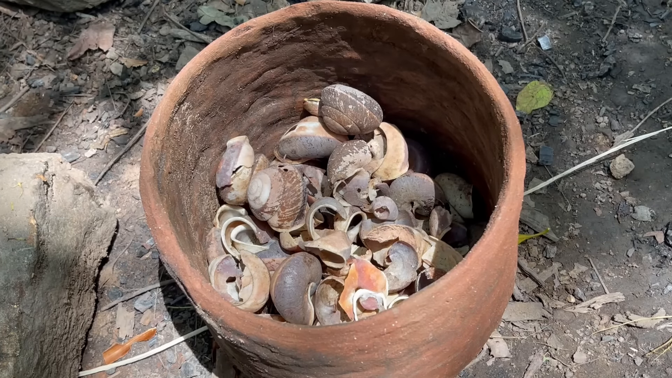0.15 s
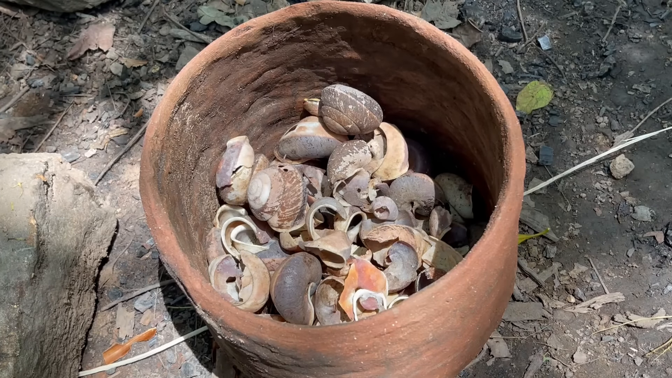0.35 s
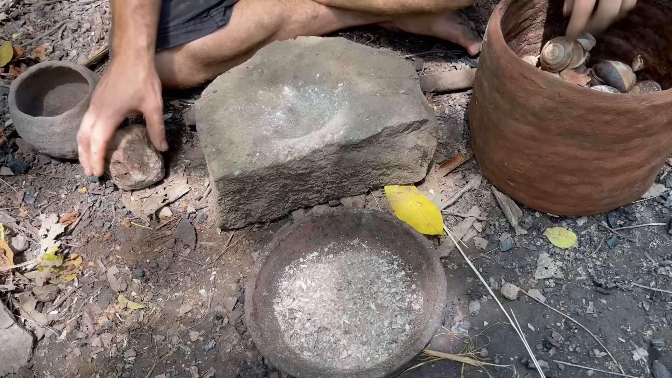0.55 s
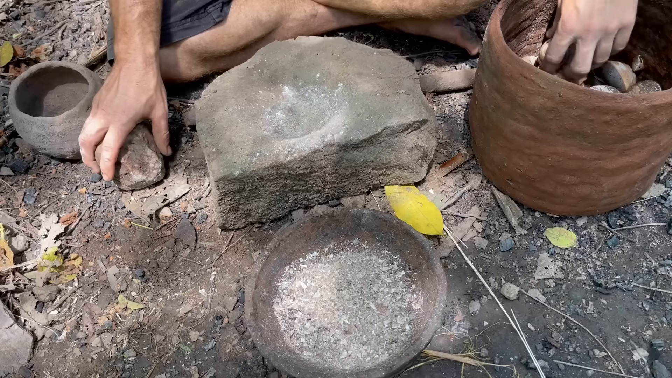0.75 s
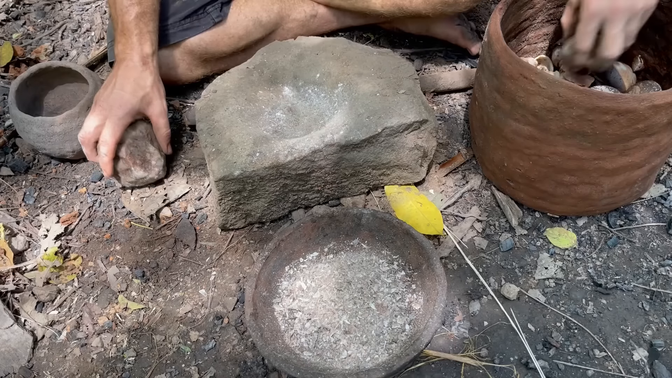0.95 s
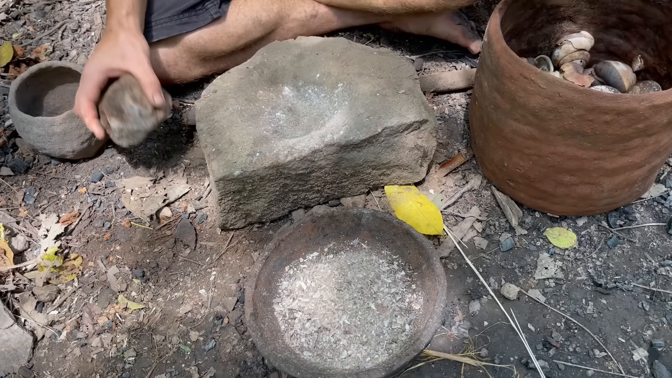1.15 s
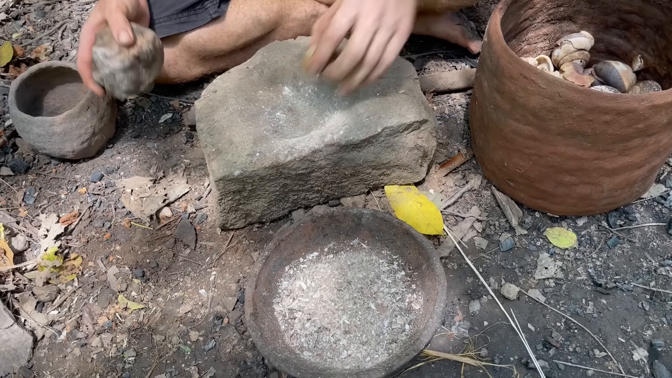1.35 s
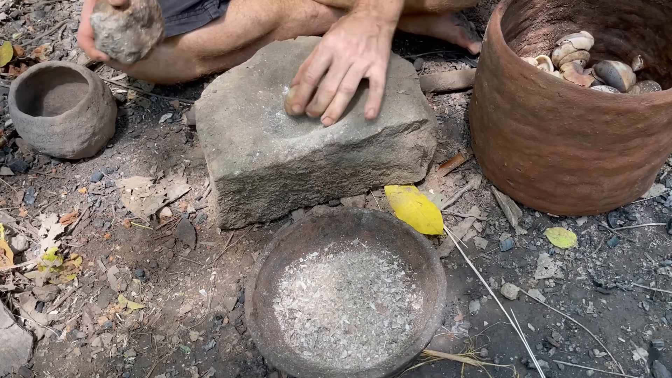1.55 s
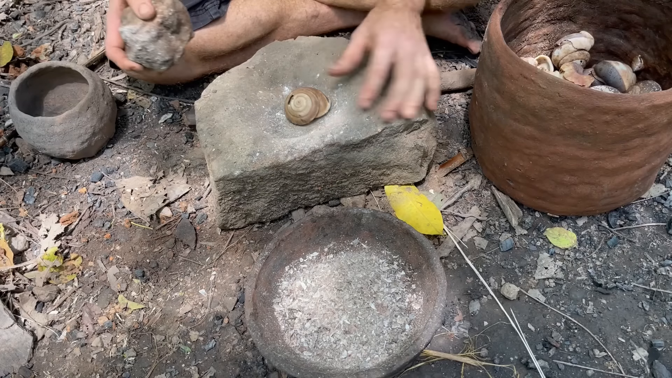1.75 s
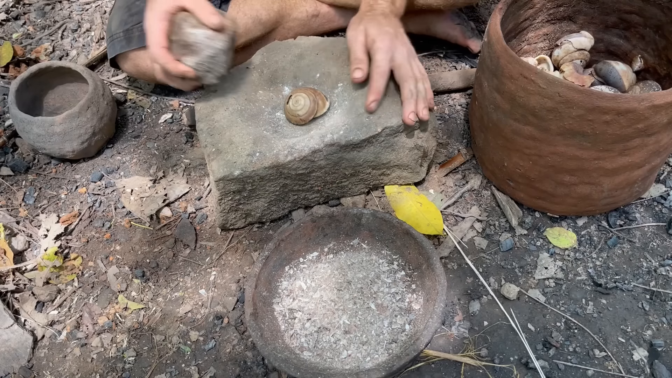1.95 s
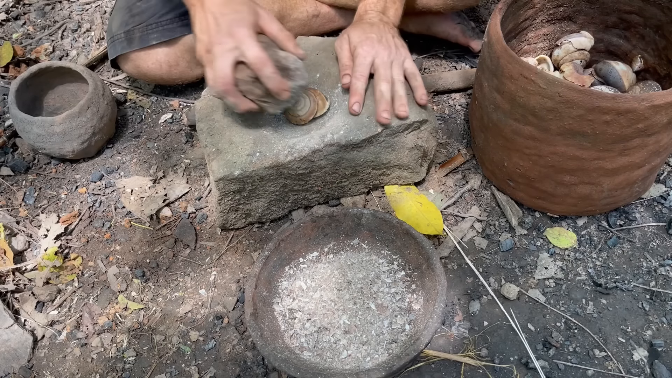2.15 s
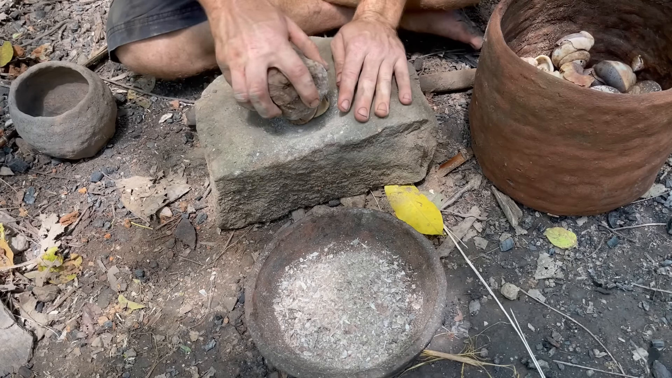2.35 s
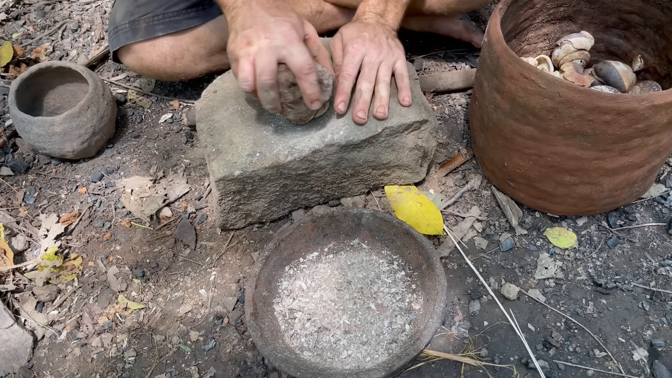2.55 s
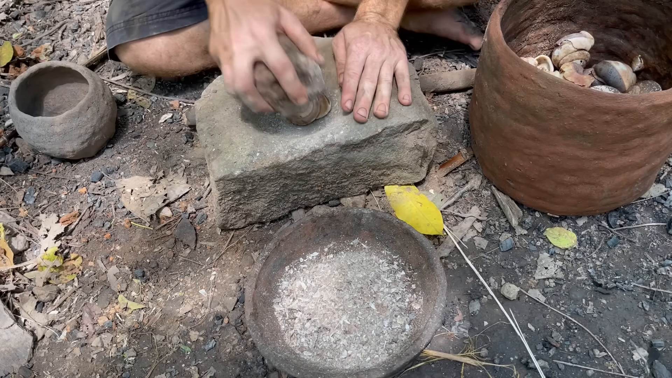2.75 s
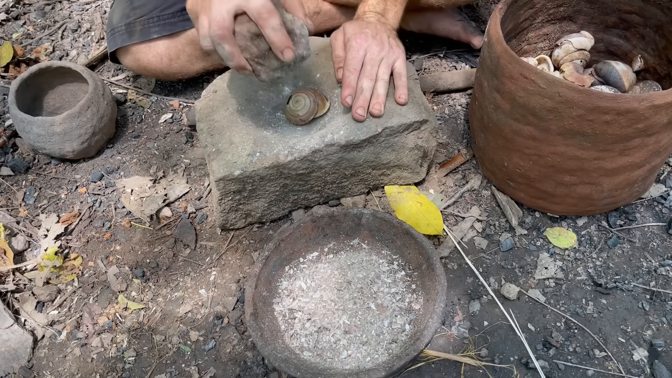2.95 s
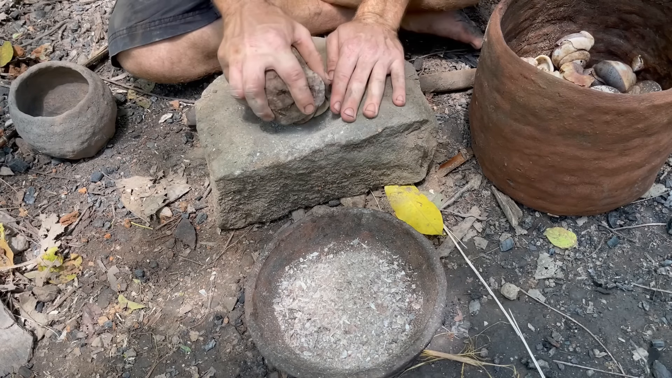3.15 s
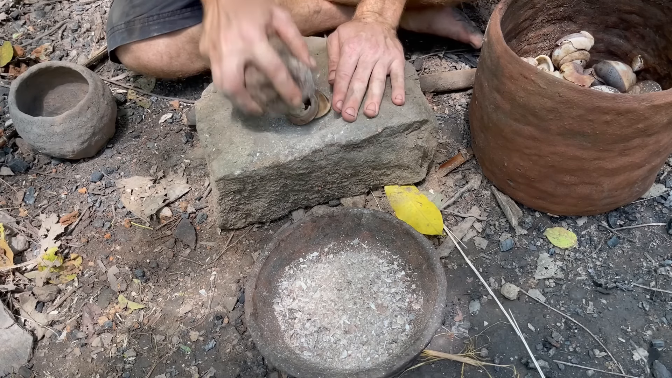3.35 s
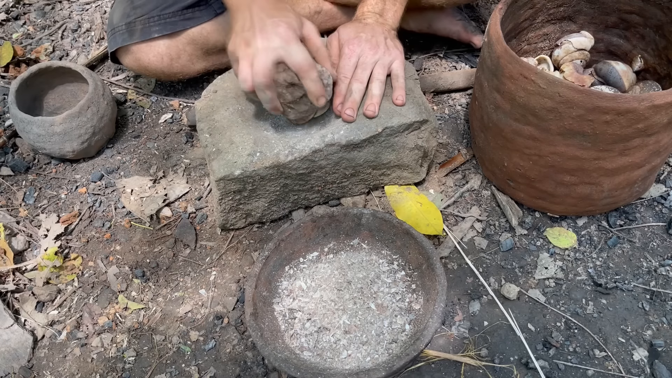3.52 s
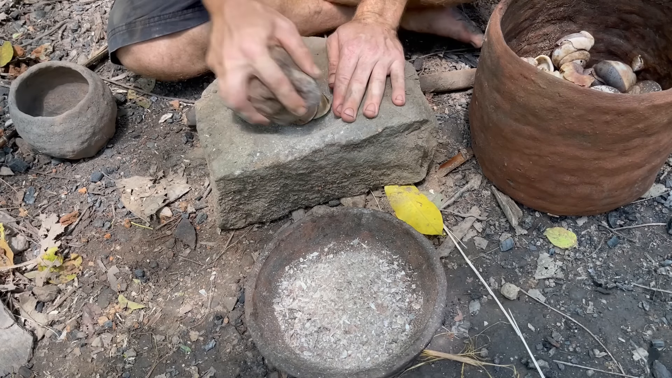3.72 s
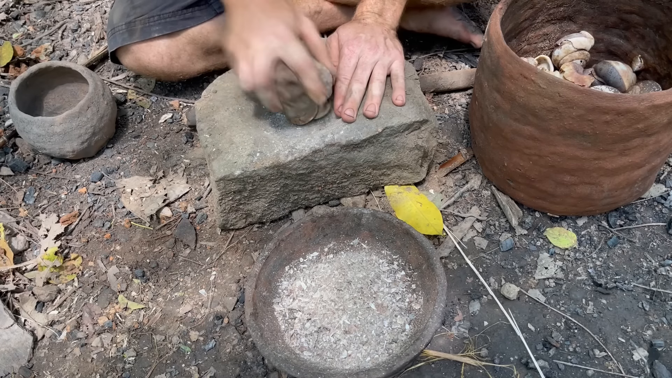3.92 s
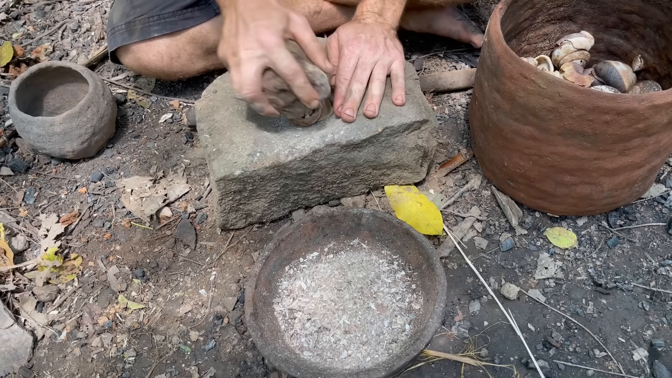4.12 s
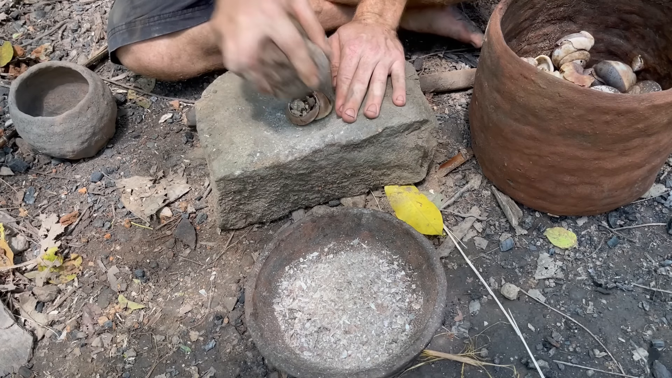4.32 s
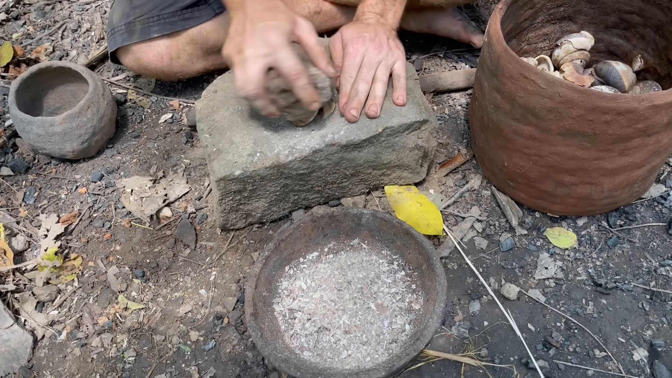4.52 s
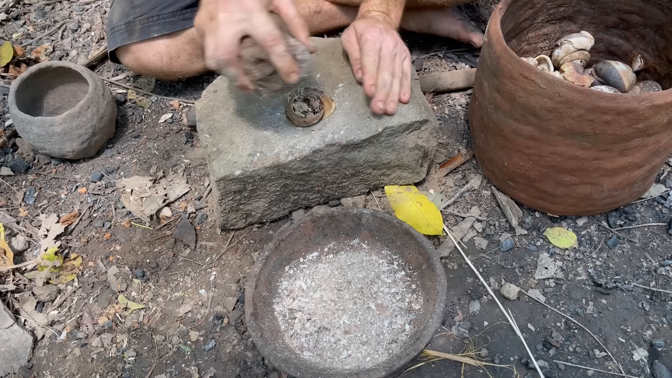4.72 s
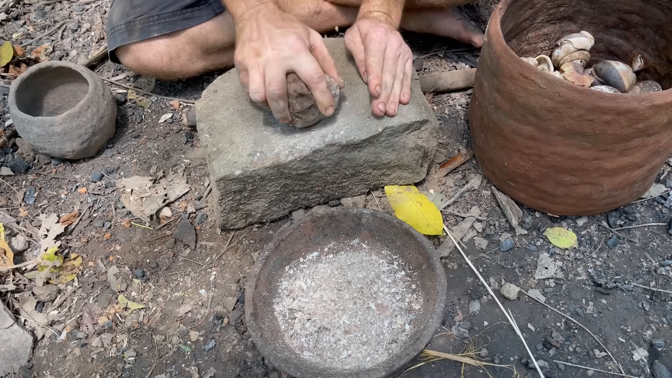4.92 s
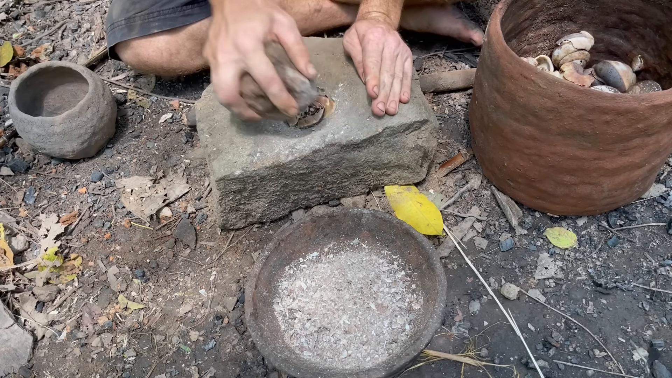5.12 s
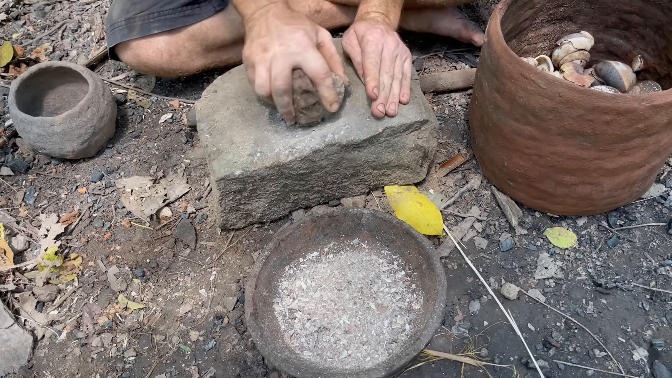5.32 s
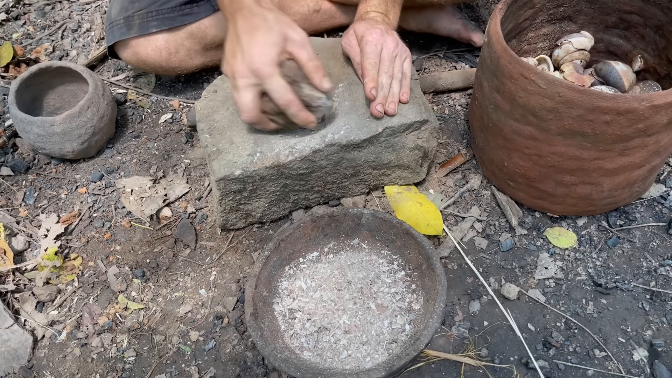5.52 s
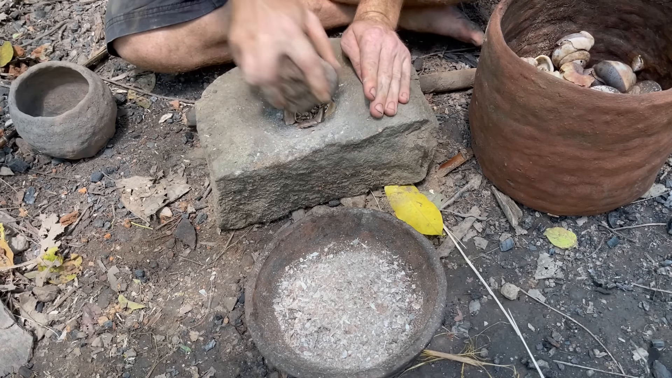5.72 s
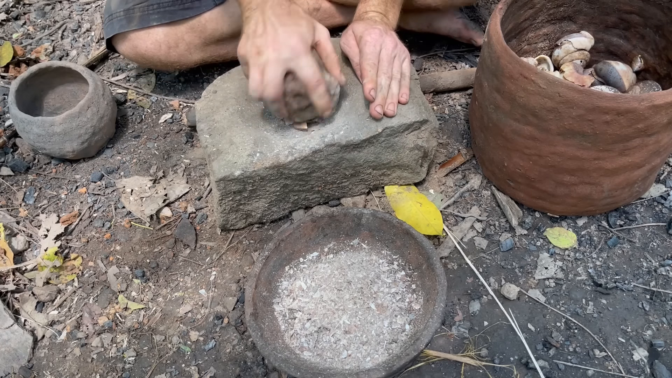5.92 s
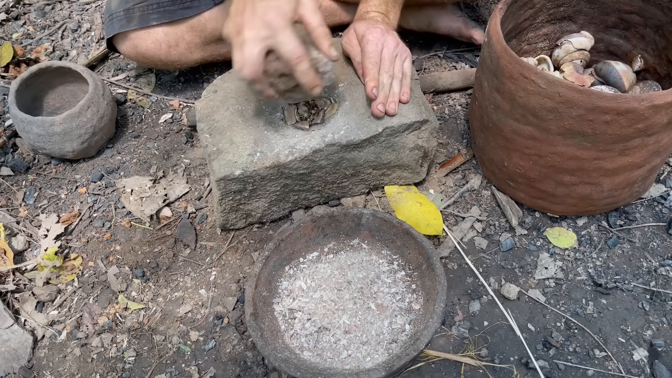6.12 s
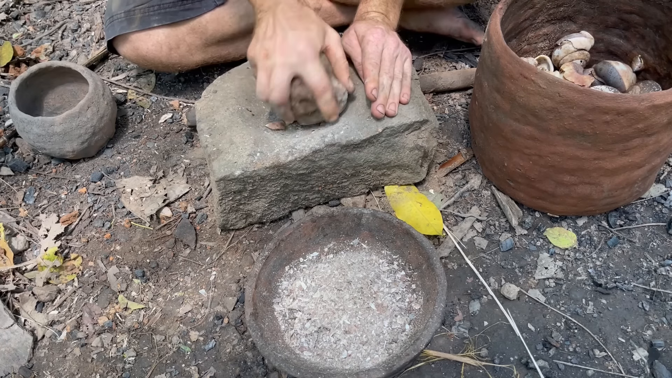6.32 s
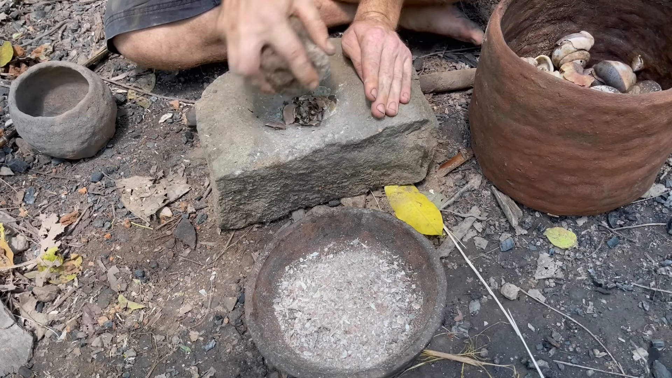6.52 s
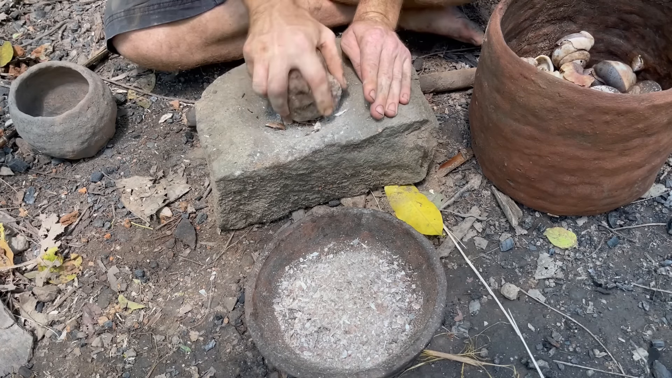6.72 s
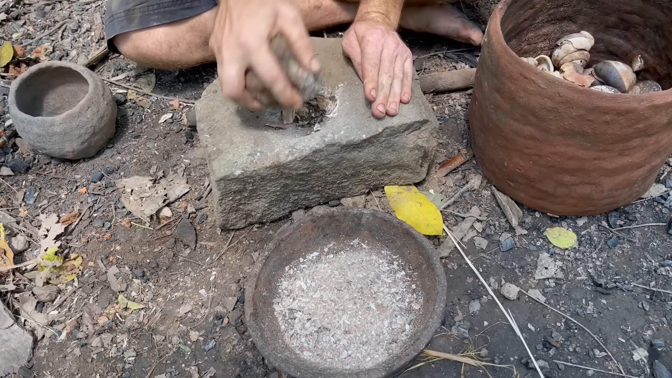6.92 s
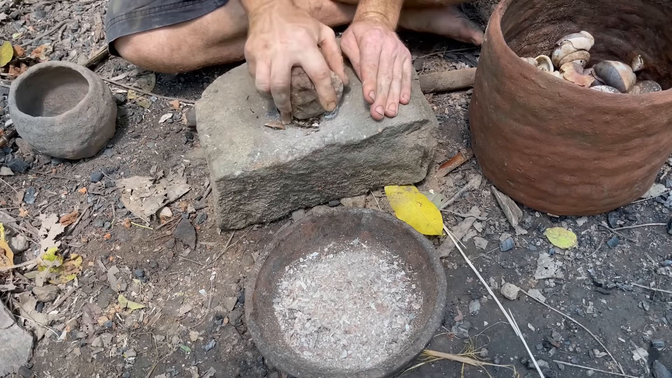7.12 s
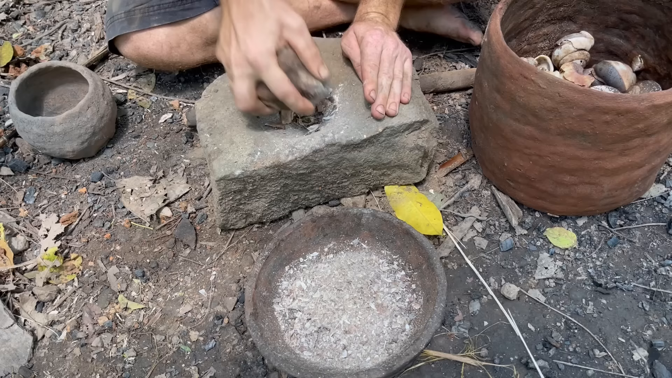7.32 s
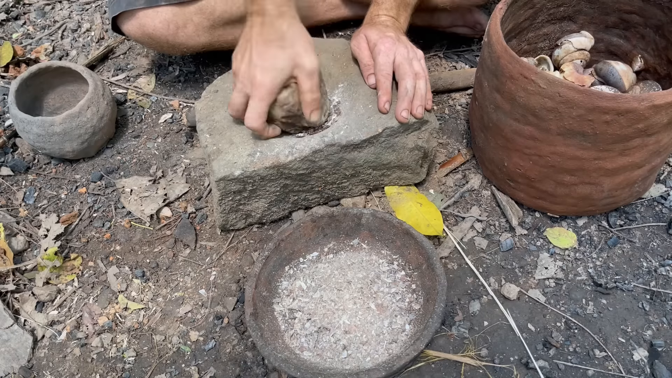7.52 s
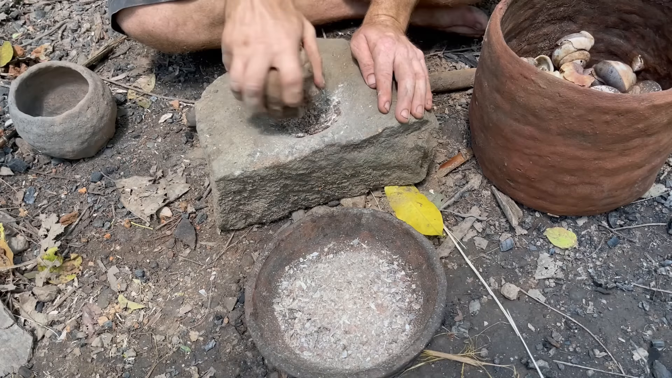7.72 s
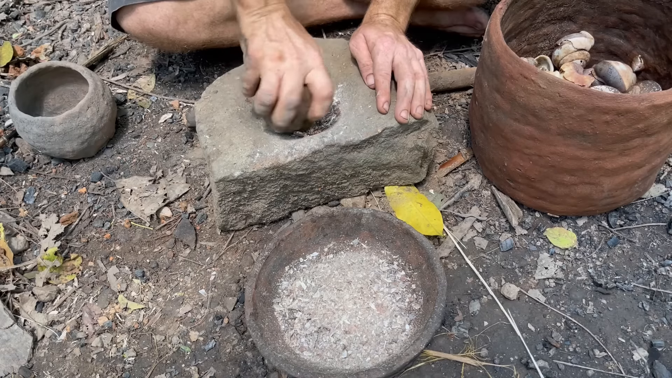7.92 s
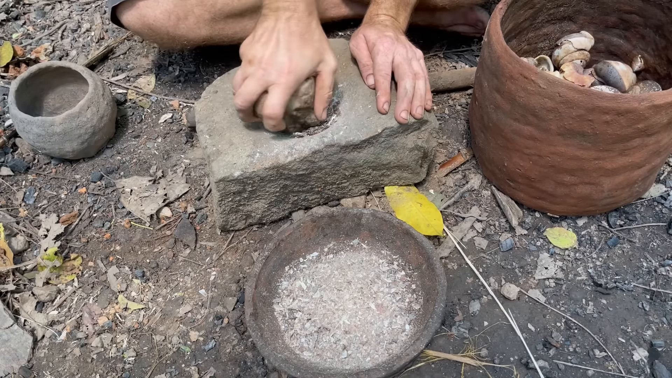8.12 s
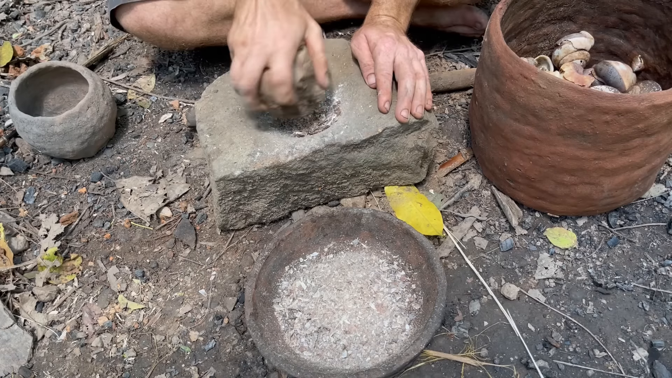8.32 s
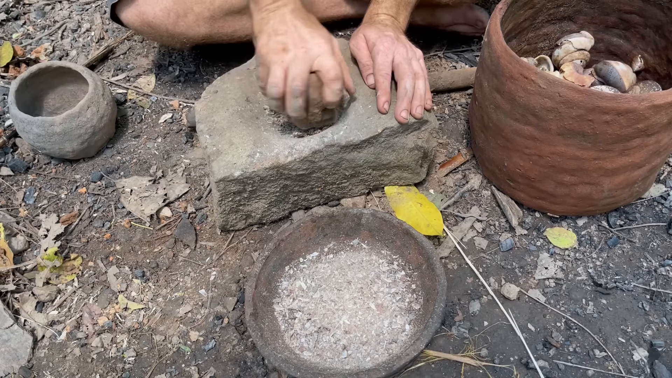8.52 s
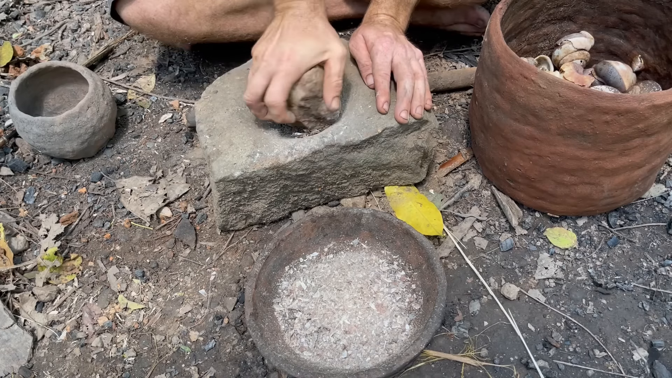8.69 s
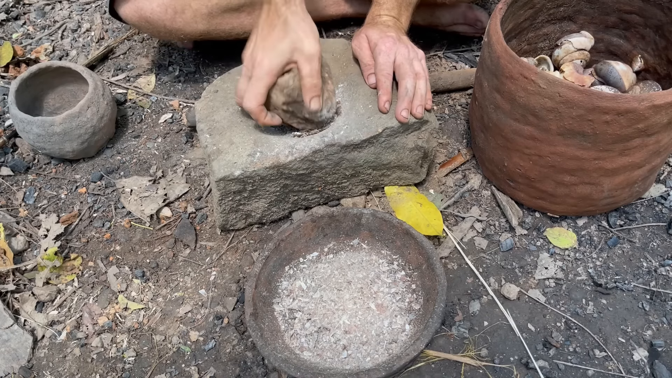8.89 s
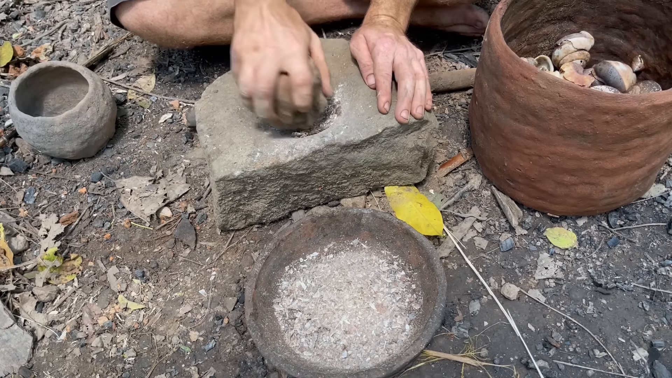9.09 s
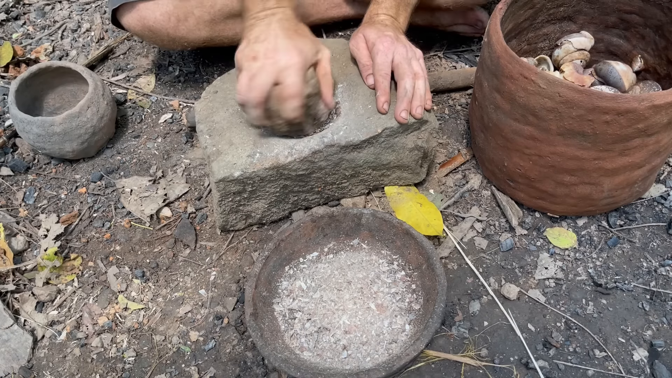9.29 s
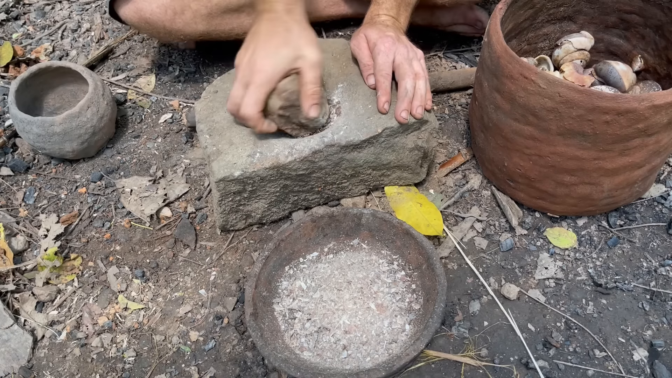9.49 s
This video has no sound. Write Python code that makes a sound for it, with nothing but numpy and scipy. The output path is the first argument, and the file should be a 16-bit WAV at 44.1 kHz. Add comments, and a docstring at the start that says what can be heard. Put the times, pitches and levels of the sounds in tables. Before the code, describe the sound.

Close, dry, slightly wide outdoor sound of a snail shell being crushed by hand. A brief clatter of shells in a pot comes first, followed by light ringing knocks on stone. A first lighter hit leads to a run of very sharp, loud cracks with low ground thuds and scattering crumbs. Finally come softer knocks and coarse rubbing of grit, as faint high insects and soft air become audible again.

```python
"""A hand stone breaks snail shells on a stone slab: shards crack as noise bursts with brief rings.
Blows knock the slab, thud through the ground with a gliding tone and leave a noisy echo tail.
Dense clicks make the gritty strokes; earlier, shells rattle in a clay pot and a whole shell rings its modes.
Outdoors behind it: insect chorus and pulsed drone, air and rumble from filtered noise and pulses.
One typed level curve dips them near 3.1 s, drops them at 3.57 s, stays low and steps up at 7.5 s."""
import sys
import numpy as np
from scipy import signal
from scipy.fft import rfft, irfft
from scipy.io import wavfile
from scipy.ndimage import uniform_filter1d

SR = 44100
rng = np.random.default_rng(int(sys.argv[2]) if len(sys.argv) > 2 else 0)


def inscribe(sig):
    """Save sig as 16-bit PCM at rate SR to the path in sys.argv[1].

    A 1-D sig is mono; a 2-D sig holds one channel per row.
    Samples are clipped to [-1, 1] before scaling.
    """
    pcm = np.round(np.clip(np.atleast_2d(sig).T, -1, 1) * 32767)
    wavfile.write(sys.argv[1], SR, pcm.astype(np.int16))


N = 421155
T = np.arange(N) / SR


def undb(db):
    """Decibels to gain."""
    return 10 ** (np.asarray(db) / 20)


def decay(t, t60_s):
    """Exponential fade that loses 60 dB in t60_s."""
    return undb(-60 * t / t60_s)


def unit(x):
    """Scale to rms 1."""
    return x / np.sqrt(np.mean(x ** 2))


def ring(x, hz, width_hz):
    """One resonance, gain 1 at its centre."""
    return signal.lfilter(*signal.iirpeak(hz, hz / width_hz, fs=SR), x)


def body(x, modes):
    """Sum of resonances."""
    return sum(undb(db) * ring(x, hz, width_hz) for hz, width_hz, db in modes)


def shade(x, points):
    """Colour by a spectrum, causally (minimum phase from the cepstrum)."""
    hz = np.fft.rfftfreq(1024, 1 / SR)
    points_hz, points_db = np.transpose(points)
    gain = undb(np.interp(np.log(hz + 1), np.log(points_hz), points_db))
    cepstrum = irfft(np.log(gain))
    # folding the second half onto the first leaves no response before time zero
    cepstrum[1:512] *= 2
    cepstrum[513:] = 0
    response = irfft(np.exp(rfft(cepstrum))) * np.ones(x.shape[:-1] + (1,))
    return signal.fftconvolve(x, response, axes=-1)[..., :x.shape[-1]]


def walk(rate):
    """Smooth random wander, spread near 1; rate is new values per second."""
    k = int(SR / rate)
    steps = np.repeat(rng.standard_normal(N // k + 1), k)
    return 0.68 * uniform_filter1d(uniform_filter1d(steps, k), k)[:N]


def curve(rows):
    """Straight lines in dB through (t/s, level/dB) points, as gain."""
    return undb(np.interp(T, *np.transpose(rows)))


def pair(alike):
    """Two noises, left and right, that share a part."""
    mid, side = rng.standard_normal((2, N))
    opposed = side * np.array([[1], [-1]])
    return np.sqrt((1 + alike) / 2) * mid + np.sqrt((1 - alike) / 2) * opposed


def add(out, s, x, db):
    """Place a short sound with the given peak."""
    i = int(s * SR)
    x = x[:N - i]
    out[i:i + len(x)] += x * undb(db) / np.abs(x).max()


def clicks(rate, spread_db, hiss):
    """Dense tiny clicks of uneven size over a little hiss; rate is clicks per second."""
    sizes = undb(spread_db * rng.exponential(size=N)) * rng.standard_normal(N)
    hits = (rng.random(N) < rate / SR) * sizes
    return unit(unit(hits) + hiss * rng.standard_normal(N))


def play(spans, upper, lower):
    """Two sounds follow the two level columns of each span, with soft ends."""
    out = np.zeros(N)
    for s, upper_db, lower_db in map(np.transpose, spans):
        gate = np.clip(np.minimum(T - s[0], s[-1] - T) / 0.024, 0, 1)
        out += gate * undb(np.interp(T, s, upper_db)) * upper
        out += gate * undb(np.interp(T, s, lower_db)) * lower
    return out


# shape of the soft air spectrum: f/Hz, relative level/dB
AIR_COLOUR = [(88, -38.5), (150, -6), (308, -5), (368, -6), (446, -6.5), (1880, -10), (2370, -7.5),
              (2680, -11), (4010, -14), (9000, -17), (10000, -32.5), (13000, -40.5), (22000, -120)]


def air():
    """Soft outdoor air: wide noise with an uneven spectrum and a wavering level."""
    mean_db = -53.5
    return unit(shade(pair(0.24), AIR_COLOUR)) * undb(mean_db + 2.0 * walk(15))


# resonances of the low rumble, passed through twice: f/Hz, width/Hz, relative level/dB
RUMBLE_MODES = [(30, 33, -13), (62.5, 23, 2.5), (108, 38, -5.5), (146, 37, -11)]


def rumble():
    """Low rumble: nearly mono noise through low resonances, slowly wavering."""
    mean_db = -52
    return unit(body(body(pair(0.99), RUMBLE_MODES), RUMBLE_MODES)) * undb(mean_db + 1.3 * walk(2.9))


# bands of the insect chorus: f/Hz, width/Hz, relative level/dB
CHORUS_BANDS = [(8600, 900, -3), (9300, 900, -3)]
# chorus before the shared level curve: t/s, level/dB
CHORUS_LEVEL = [(0, -58), (3.5, -58.5), (7.49, -58.5), (7.5, -54.5), (8.5, -52.5), (9.55, -50)]


def chorus():
    """Distant insects blur into two treble noise bands."""
    return unit(body(pair(0.2), CHORUS_BANDS)) * curve(CHORUS_LEVEL) * undb(.8 * walk(15))


# drone before the shared level curve: t/s, level/dB
DRONE_LEVEL = [(0, -60.5), (1.5, -68.5), (3.5, -75.5), (7.49, -78.5), (7.5, -58.5), (9.55, -61.5)]


def drone():
    """An insect's wing or drum pulses into one resonance; rate and strength waver."""
    mean_rate_hz, centre_hz, width_hz = 110, 2261, 220
    phase = np.cumsum(mean_rate_hz * (1 + 0.019 * walk(12))) / SR
    pulses = np.diff(np.floor(phase), prepend=0) * undb(3.4 * walk(40))
    tone = ring(ring(pulses, centre_hz, width_hz), centre_hz, 0.64 * width_hz)
    return unit(tone) * undb(4 * walk(6)) * curve(DRONE_LEVEL)


# typed level of all the surroundings: dips near 3.1 s, falls at 3.57 s, stays low,
# steps up at 7.5 s: t/s, level/dB
SURROUNDINGS_LEVEL = [(0, 0), (3.06, 0), (3.1, -8.5), (3.23, -8), (3.32, 0.5), (3.53, 1), (3.57, -32),
                      (3.75, -12.5), (3.9, -6.5), (4.01, -16.5), (4.7, -18.5), (5.44, -17), (5.8, -15),
                      (6.55, -13.5), (7.11, -11.5), (7.49, -12.5), (7.5, -0.5), (9.55, 0)]


def surroundings():
    """Air, chorus, rumble and drone share one level curve and a low-pass near 10 kHz."""
    top_hz = 10150
    together = air() + chorus() + rumble() + drone()
    low_pass = signal.ellip(10, .2, 60, top_hz, fs=SR, output="sos")
    return signal.sosfilt(low_pass, together * curve(SURROUNDINGS_LEVEL))


# bright colour shared by snaps, crumbs, crunch and rustle: f/Hz, relative level/dB
BRIGHT_COLOUR = [(2940, -28.5), (5000, -12), (6320, -11), (7020, -14), (8160, 2.5), (9200, 4.5),
                 (9770, -4.5), (10400, -21.5), (11300, -10.5), (12200, -16.5), (13400, -41), (15500, -34.5),
                 (16500, -53.5)]


def brighten(x):
    """Give noise or grains a bright colour with the microphone's resonance near 9 kHz."""
    return shade(x, BRIGHT_COLOUR)


# fingers stir the shells: t/s, rustle level/dB, pot level/dB
RUMMAGE = [(0.71, -69, -65), (0.75, -58, -52), (0.836, -44.5, -45), (0.872, -59, -57), (0.916, -36.5, -62),
           (0.958, -61, -45), (0.99, -70, -68)]
# resonances of the clay pot: f/Hz, width/Hz, relative level/dB
POT_MODES = [(300, 10.4, 20), (880, 410, 1)]


def rummage():
    """Many shells slide over each other and set the pot humming."""
    grains = clicks(1800, 1.7, 0.78)
    rustle = unit(brighten(grains)) + 0.7 * unit(ring(grains, 1200, 2400))
    rustle += .5 * unit(ring(grains, 3700, 1300))
    hum = unit(body(ring(grains, 600, 900), POT_MODES))
    return play([RUMMAGE], rustle, hum)


# the whole shell rocks and knocks on the slab: t/s, then peak level/dB of hollow, wall and lip
TAPS = [(1.532, -35.5, -29, -24), (1.538, -58, -55, -24), (1.547, -52, -44, -28),
        (1.552, -28.5, -29.5, -38), (1.562, -51, -60, -31), (1.566, -51, -57, -23.5),
        (1.608, -33, -42, -40), (1.622, -46, -32.5, -35), (1.627, -28.5, -44, -41), (1.66, -19.5, -22, -10),
        (1.674, -35, -58, -40), (1.714, -30.5, -56, -40), (1.803, -34.5, -40.5, -42),
        (1.986, -40, -55, -56), (2.105, -43.5, -61, -57), (2.842, -36, -46, -57), (2.984, -40.5, -47, -54)]
# shell modes, grouped as hollow, wall and lip: f/Hz, width/Hz, relative level/dB
SHELL_MODES = [
    [(1140, 110, 4.5), (1750, 510, -15)],
    [(2750, 240, 10), (3600, 260, -1), (3000, 2400, -4)],
    [(8430, 82, 5.5), (9230, 130, -1)],
]


def taps():
    """A short knock rings the modes of the unbroken shell."""
    out, t = np.zeros(N), T[:3000]
    group_bands = ((1280, 1900), (2960, 3800), (8800, 1100))  # f/Hz, width/Hz
    for s, *levels_db in TAPS:
        knock = rng.standard_normal(len(t)) * decay(t, 0.0056)
        for modes, db, (hz, width_hz) in zip(SHELL_MODES, levels_db, group_bands):
            focused = ring(ring(knock, hz, width_hz), hz, 1.6 * width_hz)
            add(out, s, body(focused, modes), db)
    return out


def stroke(s, peak_s, rise_s, fall_s):
    """Level in dB of a stroke that swells to its loudest moment and falls away."""
    drop_db = 17  # from the loudest moment to either end
    return -drop_db * np.maximum((peak_s - s) / rise_s, (s - peak_s) / fall_s)


# fragments shift under hand or stone: loudest t/s, rise t/s, fall t/s, crunch level/dB, grind level/dB
GRIT = [(2.505, .03, 0.037, -51, -58), (2.63, .08, .08, -60, -64), (3.275, 0.086, 0.058, -46, -64),
        (4.871, .02, 0.065, -51, -58), (4.989, 0.039, 0.039, -50.5, -74.5), (5.36, .04, .13, -46, -68),
        (5.949, 0.096, 0.078, -47, -67), (6.349, .07, 0.069, -54.5, -75.5),
        (7.231, 0.037, 0.039, -55.5, -72), (7.999, .07, 0.18, -46.5, -47.5), (8.469, 0.025, 0.18, -48, -57),
        (8.67, 0.14, .13, -44.5, -47.5), (9.33, 0.12, 0.051, -41, -44.5), (9.51, 0.07, 0.056, -56, -54.5)]
# stone against slab: f/Hz, width/Hz, relative level/dB
GRIND_MODES = [(577, 116, 0), (1075, 300, -6.5), (2070, 490, -8)]


def grit():
    """Fragments crunch brightly; stone and slab add a dull grind."""
    grains = clicks(2200, 3.2, .7)
    crunch = unit(brighten(grains)) + 0.42 * unit(ring(grains, 3150, 3600))
    crunch += 0.027 * unit(ring(ring(grains, 12500, 4000), 12500, 4000))
    grind = unit(body(ring(grains, 630, 1800), GRIND_MODES))
    spans = []
    for peak_s, rise_s, fall_s, crunch_db, grind_db in GRIT:
        s = np.array([peak_s - rise_s, peak_s, peak_s + fall_s])
        shape_db = stroke(s, peak_s, rise_s, fall_s)
        spans.append((s, crunch_db + shape_db, grind_db + shape_db))
    return play([np.transpose(span) for span in spans], unit(crunch), grind)


def between(low, high, u):
    """Pick from low to high on a logarithmic scale as u runs from 0 to 1."""
    return low * (high / low) ** u


def ticks(count):
    """Small shards snap at random moments of each stroke of grit, each with its own colour."""
    rows = []
    for peak_s, rise_s, fall_s, crunch_db, _ in GRIT:
        draw = rng.random((6, count))
        s = np.minimum(peak_s - rise_s + (rise_s + fall_s) * draw[0], T[-100])
        # base peak 8 dB over the crunch, with a random spread
        db = crunch_db + 8 + stroke(s, peak_s, rise_s, fall_s) - 5 * np.log(draw[1] + 0.045)
        ring_hz, ring_db = between(496, 2350, draw[2]), db - 19 - 10 * draw[3]
        edge_hz, edge_db = between(2800, 5900, draw[4]), db - 15.5 - 10 * draw[5]
        t60_s = np.full(count, 0.011)
        rows += zip(s, db, ring_hz, ring_db, edge_hz, edge_db, t60_s)
    return rows


# stone on slab: t/s, crumbs level/dB, knock level/dB, thud level/dB,
# thud f/Hz (near its loudest), tail level/dB, tail t60 t/s; levels are peaks
BLOWS = [(2.2694, -59, -29.5, -39, 80, -41.5, 0.21), (3.0681, -35, -35, -44, 93, -27, 0.12),
         (3.537, -36.5, -44, -26, 200, -35.5, 0.049), (3.946, -32.5, -36, -40, 115, -32, .16),
         (4.3845, -33, -41.5, -47, 90, -30, .2), (4.8445, -35.5, -40, -40.5, 104, -33, .11),
         (5.3146, -32.5, -35, -37, 122, -36.5, .088), (5.7725, -28, -33, -38, 123, -37, .062),
         (6.2147, -29, -35, -40, 104, -39.5, 0.097), (6.628, -27.5, -36.5, -37, 92, -35.5, 0.067),
         (7.0754, -35, -28, -32, 116, -35, .14), (7.835, -44, -55, -37, 111, -45, 0.072),
         (8.4672, -44, -37.5, -33.5, 115, -43, 0.072), (9.1479, -43, -54, -34.5, 106, -48, 0.074)]
# slab under the stone: f/Hz, width/Hz, relative level/dB
KNOCK_MODES = [(300, 170, -15), (603, 81, 0), (970, 110, -6)]
# resonances of the noisy echo tail after each blow: f/Hz, width/Hz, relative level/dB
TAIL_MODES = [(2560, 500, -5.5), (3760, 350, -2), (6650, 900, -0.5), (3500, 20000, -2)]


def thud(t, hz):
    """A gliding tone crosses the ground, high part first, and leaves a low sway."""
    late = 2.0 / hz  # the swell peaks this many seconds after the blow
    sag_hz = hz * (0.24 + 0.58 * late / (0.13 * late + 0.68 * t))
    swell = ((t / late) * np.exp(1 - t / late)) ** 5.0
    sway_level = 0.32 * (1 - np.exp(-(t / late) ** 2)) * decay(t, 1000 * late ** 2)
    sway = np.sin(2 * np.pi * 58 * t) * sway_level
    return np.sin(2 * np.pi * np.cumsum(sag_hz) / SR) * swell + sway


def blows():
    """A short push knocks the slab and thuds in the ground; crumbs crackle and an echo tail fades."""
    out, t = np.zeros(N), T[1:16000]
    rise = 1 - np.exp(-t / 0.0025)
    for s, crumbs_db, knock_db, thud_db, thud_hz, tail_db, tail_t60_s in BLOWS:
        noise = rng.standard_normal((3, len(t)))
        push = noise[2] * (t / .003) * np.exp(-t / 0.0037)
        add(out, s, body(ring(push, 370, 770), KNOCK_MODES), knock_db)
        add(out, s, thud(t, thud_hz), thud_db)
        crumbs = noise[0] * (1 + 2.5 * (np.abs(noise[1]) > 2.6))  # rare larger grains
        crumbs_fade = decay(t, .07) + .2 * decay(t, 0.7)
        add(out, s, brighten(crumbs) * rise * crumbs_fade, crumbs_db)
        tail = body(ring(crumbs, 5100, 8800), TAIL_MODES)
        tail_fade = decay(t, tail_t60_s) + 0.086 * decay(t, 0.5)
        add(out, s, tail * rise * tail_fade, tail_db)
    return out


# the loudest shards snap and knock: t/s, snap level/dB, hollow f/Hz, hollow level/dB,
# edge f/Hz, edge level/dB, burst t60 t/s; levels are peaks
CRACKS = [(0.741, -26.5, 790, -29.5, 4200, -29.5, 0.043), (0.8063, -33, 1900, -35, 2770, -51, 0.012),
          (0.8207, -26, 775, -28.5, 4220, -27, 0.024), (0.8255, -18, 1870, -28.5, 4700, -25.5, 0.025),
          (0.8345, -47, 2000, -37, 6400, -32, 0.017), (0.9048, -24, 880, -36, 4010, -33, .02),
          (0.9138, -26, 1300, -51, 4250, -25.5, 0.018), (0.9292, -25.5, 940, -49, 4000, -32, .012),
          (0.9442, -31.5, 815, -31.5, 2510, -46, 0.016), (2.2705, -19, 1910, -17, 3030, -8.5, 0.012),
          (2.2738, -33, 1225, -17, 2770, -20, 0.027), (2.4733, -43, 593, -32.5, 3640, -46, .011),
          (2.504, -24.5, 450, -50, 5030, -42, 0.0048), (2.5745, -32, 1120, -53, 4770, -44, .008),
          (2.618, -50, 450, -44, 3600, -43, 0.028), (2.645, -39, 2000, -55, 4500, -38, .012),
          (2.7036, -33.5, 1980, -45, 2680, -54, .029), (3.057, -41, 1200, -34, 2500, -40, 0.018),
          (3.068, -2, 1220, -10.5, 3940, -6.5, 0.014), (3.07, -5, 2100, -12, 3100, -15.5, 0.017),
          (3.078, -35, 2100, -32, 2600, -36, .018), (3.2124, -41, 2030, -59, 3340, -39.5, .016),
          (3.242, -35, 1840, -35.5, 4400, -34.5, 0.038), (3.2699, -22.5, 2240, -33, 6560, -31.5, 0.018),
          (3.2754, -31, 1190, -36.5, 5970, -31, 0.008), (3.529, -43, 1340, -49, 3580, -27, 0.042),
          (3.5402, -2.5, 404, -19, 4600, -15.5, 0.0094), (3.5441, -24, 454, -32, 3400, -28.5, .007),
          (3.733, -49, 1210, -60, 4000, -55, .012), (3.81, -41, 1620, -68.5, 4300, -50, .022),
          (3.938, -40.5, 1500, -53, 4730, -39.5, .03), (3.9482, -5.5, 1510, -23, 6480, -11.5, .013),
          (3.967, -24, 1957, -29, 3300, -31, 0.017), (4.376, -44, 1500, -60, 4900, -42, .03),
          (4.3861, -6, 1460, -20, 4860, -12.5, 0.018), (4.4003, -18.5, 1990, -24.5, 6700, -26, 0.014),
          (4.4077, -21, 1186, -40, 3770, -36, .021), (4.8408, -31, 2076, -49, 5100, -36.5, 0.016),
          (4.8454, -8.5, 2050, -21.5, 6040, -17.5, 0.017), (4.851, -28, 1820, -26, 3800, -26, .013),
          (4.895, -34.5, 1770, -40.5, 5100, -43, 0.014), (4.9637, -43, 1120, -56, 3670, -49, .016),
          (4.9909, -39, 1990, -52, 4430, -49, .02), (5.3127, -9, 2020, -49, 6250, -20.5, 0.013),
          (5.315, -5, 1920, -23, 5200, -21, 0.016), (5.3246, -31, 514, -36, 5140, -42, 0.0091),
          (5.352, -25, 1910, -53, 5070, -58, .015), (5.357, -24, 2190, -57, 6490, -48, 0.012),
          (5.377, -34, 2010, -59, 4600, -53, 0.0088), (5.3953, -22.5, 1920, -54, 6490, -56, 0.01),
          (5.415, -25.5, 550, -48.5, 6800, -40, 0.013), (5.431, -27, 1940, -44, 4370, -44, .018),
          (5.7718, -3.5, 600, -26, 6140, -30, 0.023), (5.7782, -10, 1990, -38, 5200, -19, 0.0034),
          (5.782, -11, 447, -41, 5020, -31, 0.0058), (5.7976, -13, 607, -49, 6400, -38, 0.0063),
          (5.802, -21.5, 560, -45, 5000, -31.5, 0.015), (5.807, -21, 2100, -67, 6400, -45, .016),
          (5.8195, -15.5, 590, -44, 6330, -33, 0.0069), (5.877, -35, 2020, -61, 6350, -43, .01),
          (5.8877, -31, 1900, -55, 6300, -50, 0.013), (5.931, -28, 1040, -53, 6200, -46, 0.017),
          (5.95, -19, 2540, -56, 6140, -34, 0.019), (5.961, -27, 2390, -57, 6700, -37, .011),
          (5.985, -37, 2010, -61, 6310, -48, .02), (6.2142, -4.5, 710, -28.5, 6660, -13.5, 0.011),
          (6.2185, 0.5, 640, -24.5, 5850, -29, 0.0088), (6.2225, -15, 673, -34, 4900, -31, 0.016),
          (6.312, -50.5, 2100, -52, 3120, -47.5, .012), (6.34, -48, 2100, -45, 3400, -36.5, 0.0087),
          (6.3607, -45, 2300, -67, 5900, -38.5, 0.013), (6.3703, -35.5, 1860, -68.5, 6280, -56, .013),
          (6.6293, -1, 990, -27, 6780, -16, 0.019), (6.6349, -25.5, 447, -29, 3940, -44, 0.0097),
          (6.8111, -38, 450, -56.5, 6480, -50, .013), (7.016, -45, 1490, -58, 4460, -52.5, .015),
          (7.0768, -5.5, 740, -8, 2450, -39, 0.0086), (7.0797, -25, 990, -15.5, 3190, -36, 0.016),
          (7.0972, -27, 440, -35, 6240, -42, 0.016), (7.118, -33, 1460, -49, 5000, -43, .02),
          (7.2313, -28.5, 1060, -51, 6400, -62.5, .011), (7.8366, -20.5, 443, -37.5, 6530, -47, 0.015),
          (7.999, -31, 500, -52, 2620, -48, 0.011), (8.0703, -33, 570, -40, 3310, -49, 0.032),
          (8.4676, -20, 1100, -35, 5170, -38, 0.0095), (8.4921, -30, 2370, -46, 3170, -45, .01),
          (8.5833, -32, 900, -49, 3190, -42, .019), (8.659, -15.5, 633, -33, 6700, -44, 0.0055),
          (8.663, -26.5, 620, -28.5, 3400, -39, 0.01), (8.697, -35, 546, -34, 2620, -47, 0.015),
          (9.1486, -18, 940, -38, 3870, -41, 0.011), (9.2861, -30, 630, -38.5, 4900, -50, 0.022),
          (9.325, -34, 1080, -44, 3600, -41, .02), (9.346, -35, 535, -30, 3340, -46, .013),
          (9.4906, -30, 1070, -44, 5660, -39, 0.033)]


def cracks():
    """Bright, broad fracture bursts lean on the hollow of the piece and the edge of the shard."""
    out, t = np.zeros(N), T[:2000]
    for s, snap_db, hollow_hz, hollow_db, edge_hz, edge_db, t60_s in CRACKS + ticks(count=8):
        burst = rng.standard_normal(len(t)) * (1 - np.exp(-t / 0.00071)) * decay(t, max(t60_s, .002))
        broad_low = ring(ring(burst, 1300, 1100), 1300, 1100)
        broad_mid = ring(ring(burst, 3400, 2800), 3400, 2800)
        hollow = ring(ring(burst, hollow_hz, 660), hollow_hz, 290) + 0.38 * broad_low
        edge = ring(ring(burst, edge_hz, 2600), edge_hz, 800) + 0.41 * broad_mid
        add(out, s, brighten(burst), snap_db)
        add(out, s - .0006, hollow, hollow_db)
        add(out, s, edge, edge_db)
    return out


# phase between the two ports: f/Hz, left lead/rad
LEAD = [(0, 0), (600, .3), (1500, .55), (2500, 1.2), (4200, 1.25), (8000, 1.4), (12000, 1.3)]
# level between the two ports: f/Hz, left minus right level/dB
LEAN = [(60, 2.5), (110, 0.0), (200, 3), (380, 1), (700, 1), (1290, 1.5), (2380, 1), (4400, 6.5), (8120, 2),
        (15000, -3.5)]


def ports(near):
    """Two microphone ports hear the close work with their own delay and level."""
    hz = np.fft.rfftfreq(N, 1 / SR)
    lead = np.interp(hz, *np.transpose(LEAD))
    lean_hz, lean_db = np.transpose(LEAN)
    lean = np.interp(np.log(hz + 1), np.log(lean_hz), lean_db)
    half = undb(lean / 2) * np.exp(.5j * lead)  # each side takes half of the difference
    return irfft(rfft(near) * np.array([half, 1 / half]), N)


def scene():
    """Close work on the slab over the surroundings."""
    near = rummage() + taps() + grit() + blows() + cracks()
    return surroundings() + ports(near)


def record(dry):
    """Round the loudest peaks softly and cut the top of the treble."""
    top_hz = 16600
    rounded = .82 * np.tanh(dry / .82)
    return signal.sosfilt(signal.ellip(10, .2, 80, top_hz, fs=SR, output="sos"), rounded)


dry = scene()
out = record(dry)
inscribe(out)
```